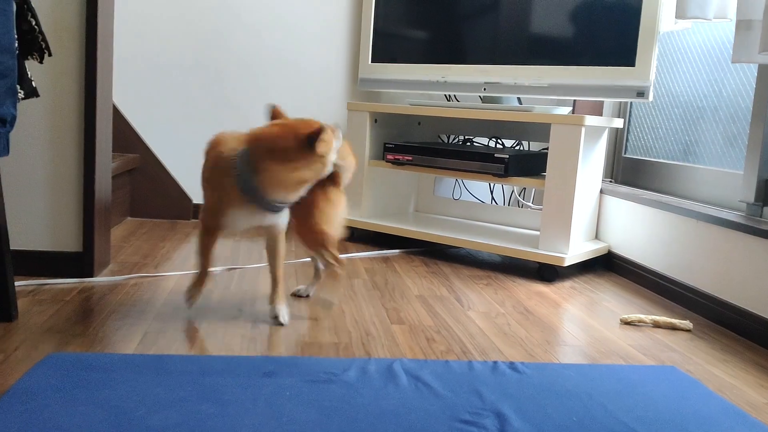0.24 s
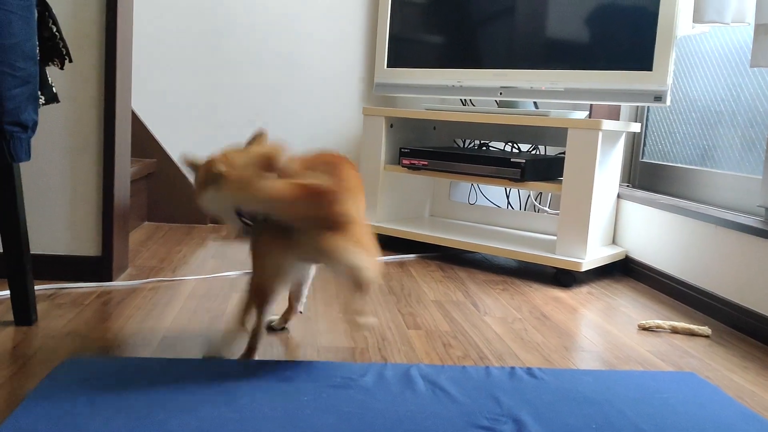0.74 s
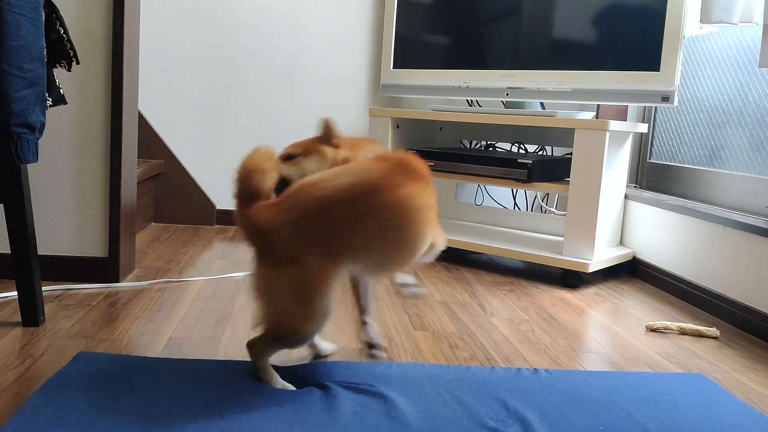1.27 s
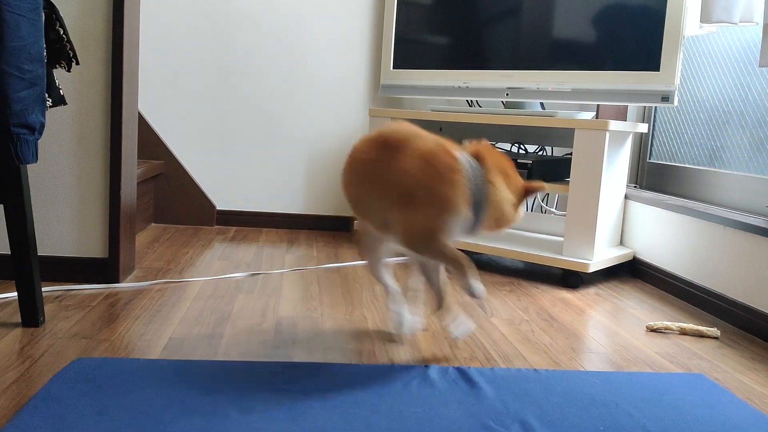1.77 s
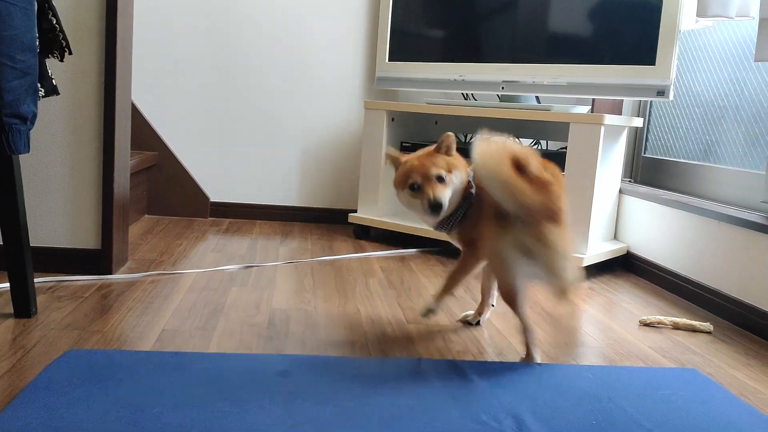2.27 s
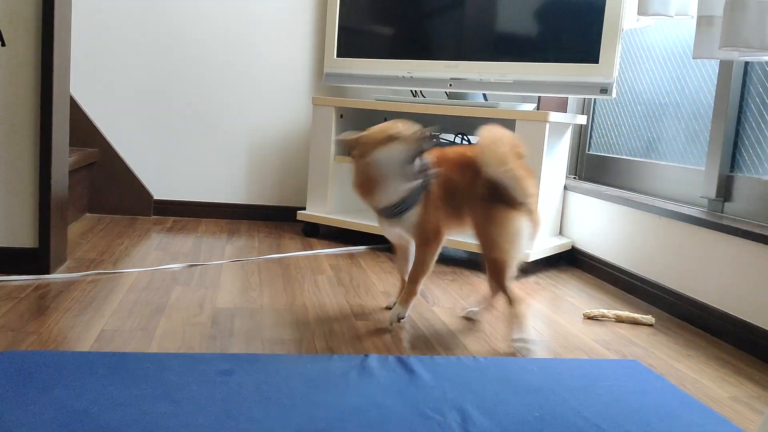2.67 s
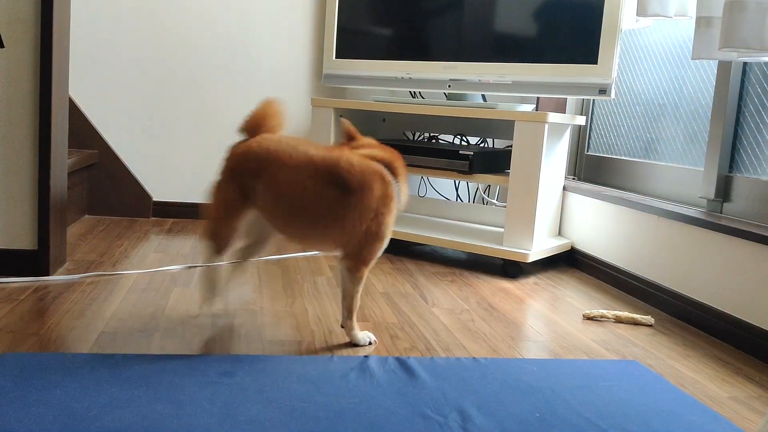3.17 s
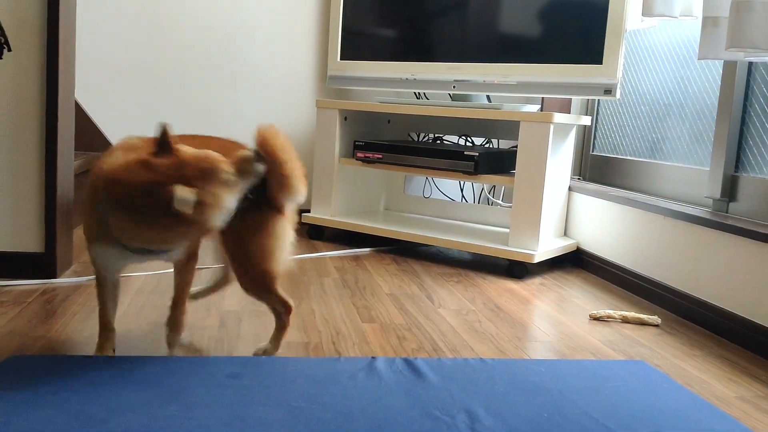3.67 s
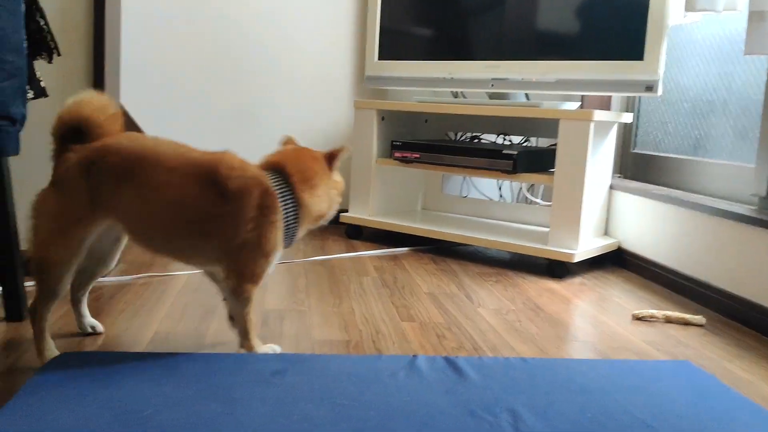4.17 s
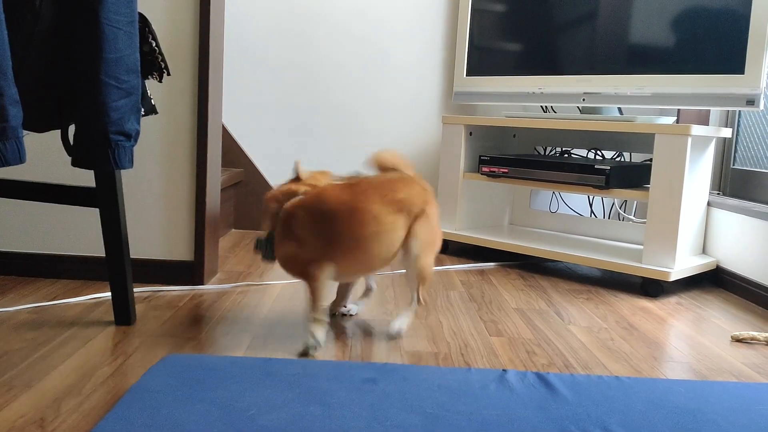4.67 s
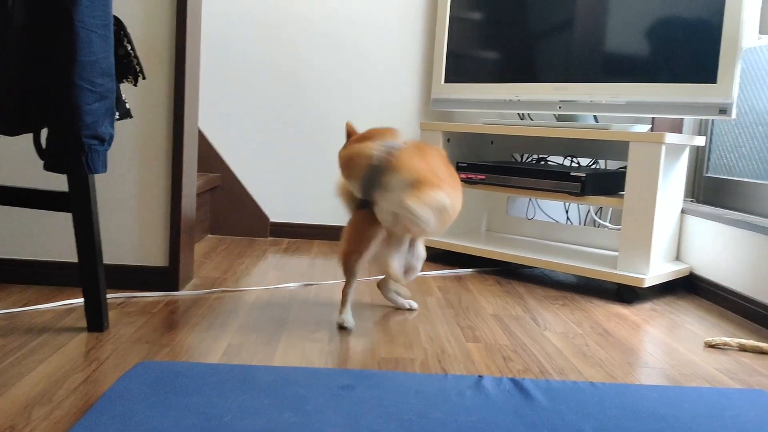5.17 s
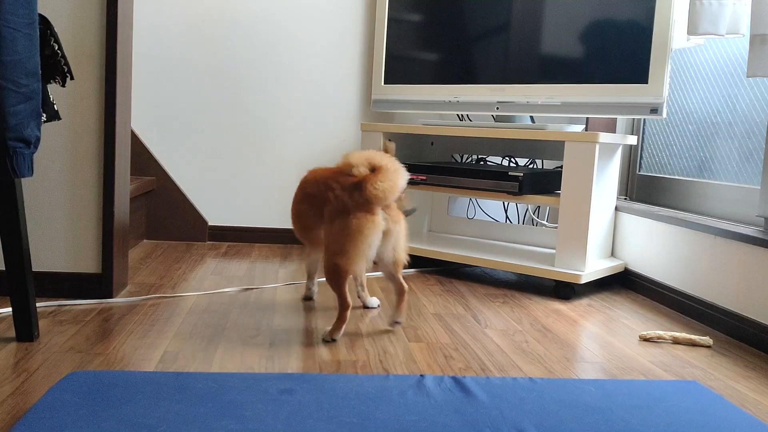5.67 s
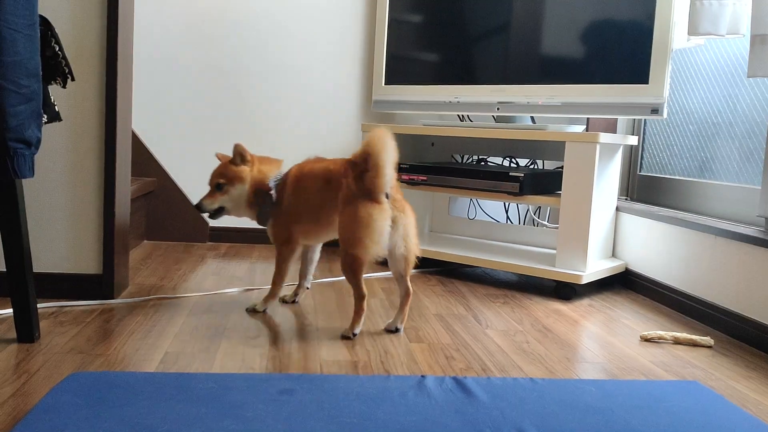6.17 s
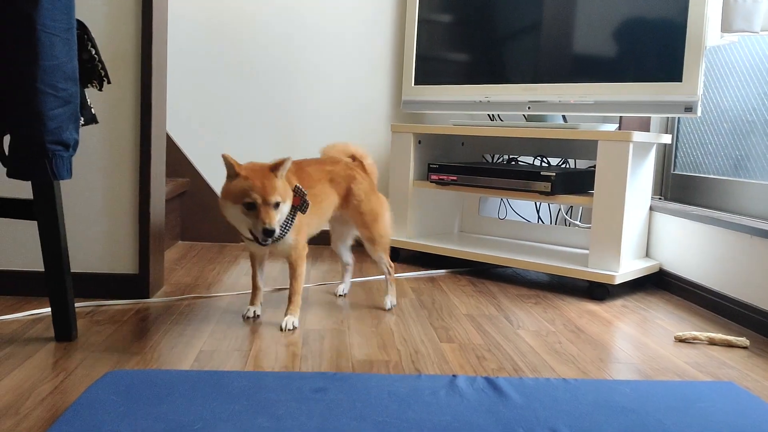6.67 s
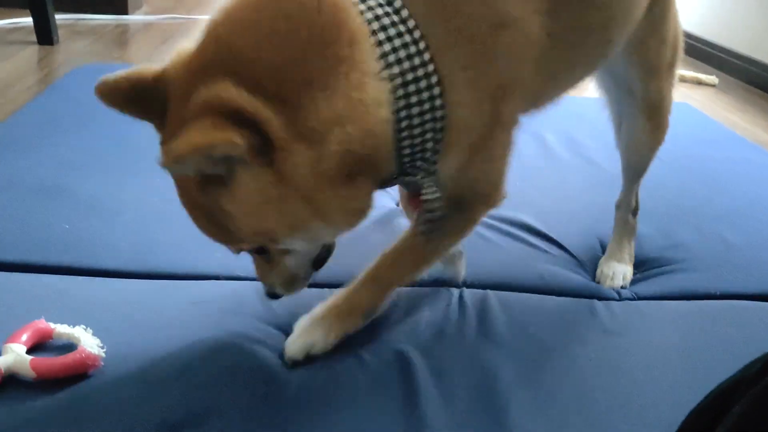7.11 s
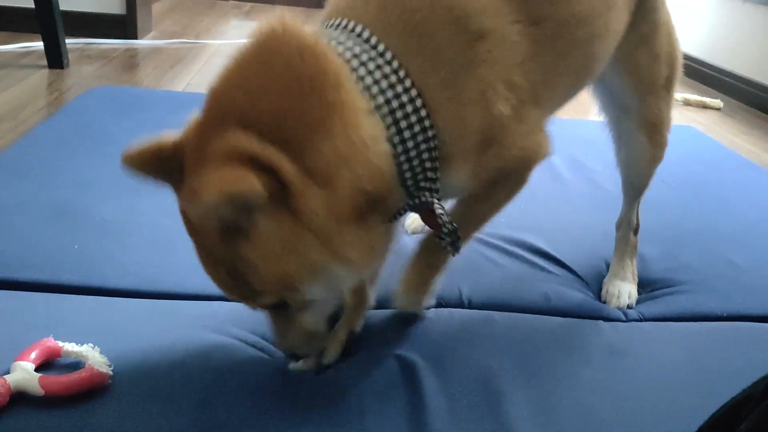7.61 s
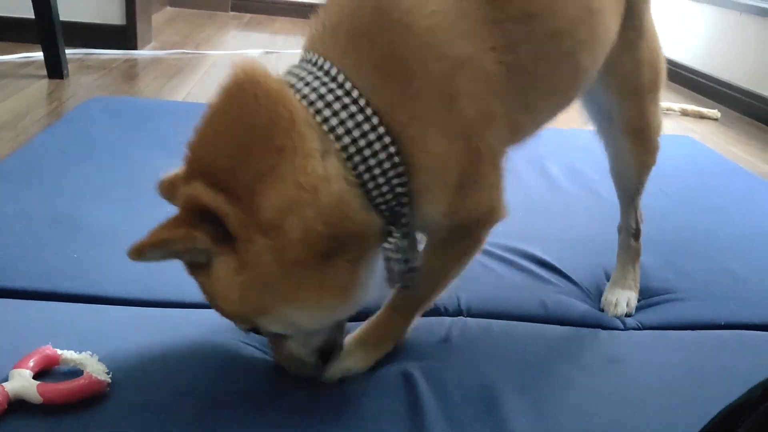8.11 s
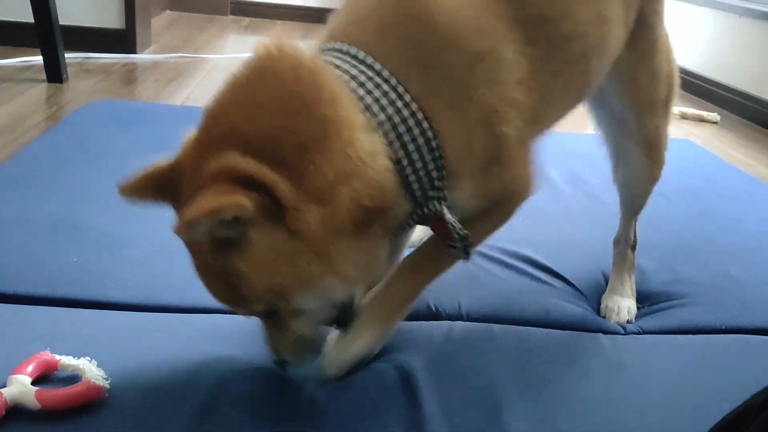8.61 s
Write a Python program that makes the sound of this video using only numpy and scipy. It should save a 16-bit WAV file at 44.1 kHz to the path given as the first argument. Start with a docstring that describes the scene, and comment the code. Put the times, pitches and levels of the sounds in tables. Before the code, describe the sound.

Light dog footfalls scatter across a wooden floor a few metres from a stereo microphone, clicking, scuffing and slipping in short bursts with short room ring and abrupt changes between bouts. One turn rustles and knocks on a soft mat. Then a brief gap, low pops, and about eleven nearby digging strokes scrape over cloth, roughly six per second, with soft thuds and snaps, over low floor rumble.

```python
"""Living room, wooden floor: a small dog spins and dashes in short bouts, the room ring cut between them.
Footfalls: claw ticks, pad scuffs, board thumps and short slips, from damped pulses, grains and modes.
Some paws scratch or squeak (stick-slip); in one turn they skid over a soft mat (rustling noise, knocks).
After a brief silence and low pops the dog digs close by at a fabric-covered mat: each stroke rasps,
zips across the weave and ends in a thud and a snap. Behind: room air and a low floor rumble."""
import sys
import numpy as np
from scipy import signal
from scipy.fft import rfft, irfft
from scipy.io import wavfile
from scipy.ndimage import uniform_filter1d

SR = 44100
rng = np.random.default_rng(int(sys.argv[2]) if len(sys.argv) > 2 else 0)


def generate_wav(sig):
    """Save sig (samples, or channels by samples) to the path in sys.argv[1] as 16-bit PCM at SR."""
    pcm = np.round(np.clip(np.atleast_2d(sig).T, -1, 1) * 32767).astype(np.int16)
    wavfile.write(sys.argv[1], SR, pcm)


N = 390285
TIME = np.arange(N) / SR

# Source levels in dB are taken before the direct and room gains given to place().
# footfalls: start_s, tick_db, tick_hz, weight_db, board_spot_hz
FOOTFALLS = [(0.236, -63, 5260, -75, 85), (0.248, -61, 5200, -85, 85), (0.2623, -47, 5750, -58, 85),
             (0.3428, -48, 5130, -65, 100), (0.4237, -51, 5000, -63, 185), (0.4264, -49, 5100, -74, 185),
             (0.4866, -51, 5250, -56, 214), (0.5892, -39, 5630, -48, 97), (0.727, -44.5, 5700, -61.5, 260),
             (0.789, -48, 5600, -70, 260), (0.824, -47, 5000, -49, 260), (0.8297, -42, 5060, -60, 260),
             (0.8502, -43, 5800, -52, 412), (0.901, -41, 6360, -62, 430), (0.909, -43.5, 5000, -45.5, 153),
             (1.1982, -42.5, 5400, -54, 430), (1.4915, -45, 5600, -46.5, 276),
             (1.6845, -45, 5570, -50, 151), (1.7179, -57, 5300, -70, 450), (1.89, -51, 5000, -90, 375),
             (1.907, -46, 5370, -49.5, 365), (2.1322, -45, 4840, -52.5, 90), (2.139, -55, 5200, -60, 284),
             (2.239, -51, 4740, -58.5, 162), (2.245, -57, 4970, -64, 155), (2.263, -60, 5460, -65, 155),
             (2.439, -51.5, 5130, -69, 110), (2.4915, -51.5, 5160, -66, 135),
             (2.7793, -41, 5700, -52.5, 318), (2.912, -54, 5130, -64, 126), (2.965, -53, 5470, -75, 430),
             (3.01, -56, 6620, -59.5, 413), (3.0926, -39.5, 5670, -48.5, 258), (3.1783, -47, 4900, -67, 85),
             (3.229, -55, 5140, -75, 90), (3.294, -52, 5360, -57.5, 97), (3.359, -46.5, 5270, -48, 154),
             (3.3685, -56, 5300, -57.5, 154), (3.53, -43.5, 6230, -51.5, 171),
             (3.6088, -55, 5000, -65, 150), (3.7395, -49.5, 5100, -61.5, 182),
             (3.747, -48.5, 5040, -93, 197), (3.8246, -47, 5860, -50.5, 99), (3.8327, -52, 5450, -65, 200),
             (3.858, -46, 5700, -87, 90), (4.039, -51, 5800, -59, 205), (4.1114, -36.5, 6200, -53, 98),
             (4.178, -59, 5900, -52, 260), (4.344, -52.5, 5050, -66, 338), (4.383, -46.5, 5900, -57, 185),
             (4.4545, -42, 5140, -45.5, 184), (4.4622, -52, 4900, -51, 850), (4.582, -53, 4900, -85, 85),
             (4.669, -43.5, 5800, -49, 269), (4.684, -47, 5200, -45, 280), (4.7288, -41, 4300, -47.5, 383),
             (4.782, -51, 6000, -61, 250), (5.02, -44.5, 5150, -60, 306), (5.0634, -46, 5030, -59, 135),
             (5.1972, -41, 4400, -42.5, 183), (5.358, -53, 4300, -66, 430), (5.407, -44, 4730, -89, 430),
             (5.481, -49.5, 4670, -58.5, 300), (5.491, -49, 4760, -84, 270),
             (5.543, -39.5, 4630, -46.5, 257), (5.763, -68, 5000, -94, 195), (5.9072, -56, 4270, -63, 175),
             (5.926, -46.5, 5100, -59, 178), (6.0534, -51, 4560, -70, 100), (6.2183, -68, 4700, -73.5, 430),
             (6.345, -62, 4700, -91, 215), (6.3749, -50.5, 4900, -87, 325),
             (6.434, -43.5, 4700, -51.5, 305), (6.593, -43.5, 4920, -51, 213),
             (6.7214, -54, 4230, -68, 270), (6.7666, -48, 4540, -66.5, 227)]
# short scratchy slides and faint rustles, and at the very start a brief scratchy burst: start_s, length_s,
# level_db
SCRATCHES = [(.002, 0.0058, -56), (0.274, 0.11, -61.5), (0.724, 0.073, -55.5), (.962, 0.13, -53),
             (1.333, 0.15, -62), (1.85, 0.15, -57), (2.259, 0.13, -61.5), (2.333, 0.047, -54),
             (2.501, 0.094, -56.5), (2.66, 0.39, -65.5), (3.007, 0.19, -64.5), (3.147, 0.048, -54),
             (3.448, 0.047, -60), (3.556, 0.032, -56.5), (3.849, 0.059, -57.5), (4.206, 0.052, -57),
             (4.517, 0.044, -57), (4.863, 0.16, -65), (5.007, 0.024, -51.5), (5.377, 0.031, -49),
             (5.762, 0.13, -73.5), (6.98, 0.13, -64.5)]
# skids over the mat: start_s, length_s, initial_rustle_db, initial_upper_edge_hz
MAT_SKIDS = [(0.791, 0.36, -44, 1950), (1.129, 0.19, -50.5, 1020), (1.271, 0.21, -53, 700),
             (1.41, 0.11, -51.5, 700)]
# paw knocks on the mat: start_s, level_db, spot_hz
MAT_KNOCKS = [(0.888, -50, 380), (.94, -47, 260), (1.003, -45.5, 304), (1.095, -40.5, 188),
              (1.145, -42, 460), (1.175, -48, 404), (1.253, -63, 280)]
# pad squeaks: start_s, length_s, level_db, from_hz, to_hz
PAD_SQUEAKS = [(0.786, 0.062, -50.5, 1186, 1533), (0.803, 0.058, -51.5, 1055, 895),
               (0.878, 0.13, -54, 1488, 1784), (2.275, 0.054, -57, 2094, 1676),
               (3.455, 0.029, -56.5, 1487, 1433), (4.465, 0.048, -56, 955, 820),
               (4.72, 0.021, -53, 1544, 1620), (5.874, 0.03, -60.5, 776, 1170)]
# digging strokes: start_s, length_s, rasp_db, drag_hz, drag_db, flick_hz, flick_db,
# drag_jitter (rms share of pitch), thud_db
DIG_STROKES = [(7.127, 0.065, -49, 2367, -50, 6840, -51, 0.15, -57),
               (7.249, 0.083, -50, 2207, -43.5, 3815, -54, 0.05, -49.5),
               (7.414, 0.072, -49, 2640, -50.5, 6600, -53.5, 0.14, -57),
               (7.588, 0.055, -48.5, 2866, -47, 5960, -52.5, 0.12, -48.5),
               (7.74, 0.075, -49, 2345, -50, 6500, -59.5, 0.26, -62.5),
               (7.903, 0.067, -53, 2560, -47, 6100, -60.5, 0.02, -50.5),
               (8.081, 0.062, -54, 2480, -55, 5920, -65, 0.26, -63),
               (8.221, .046, -49, 2885, -50, 6800, -51, 0.09, -47),
               (8.4, 0.069, -54, 2566, -55, 5300, -63, 0.02, -68),
               (8.527, 0.071, -53, 2566, -51.5, 4240, -62, 0.08, -54.5),
               (8.696, 0.079, -52.5, 2495, -55, 6240, -63, 0.19, -63.5)]
# claws of one paw sliding at unlike speeds: rate (ratio to leading claw), level_db
CLAW_RATES = [(1, 0.5), (.86, -10.5), (1.12, -11)]
# padding rumble under the digging: time_s, level_db
KNEAD_LEVELS = [(7.12, -75), (7.25, -53), (7.37, -50), (7.55, -55.5), (7.75, -55.5), (7.9, -60), (8.2, -59),
                (8.35, -57), (8.4, -48.5), (8.45, -57.5), (8.85, -56.5)]
# soft low pops: start_s, level_db
LOW_POPS = [(6.988, -42.5), (7.048, -38), (7.062, -40.5), (7.107, -44.5)]
# floorboard modes: lowest_hz (each blow up to 4 % higher), relative_db, t60_s
BOARD_MODES = [(58, -9.5, 0.36), (87, 1.5, 0.2), (130.2, -14, 0.49), (156.7, 0, 0.14), (199.4, -1.5, 0.12),
               (228, -1, 0.13), (258, 5.5, 0.066), (296, 0, 0.089), (321.3, -2, 0.1), (373.5, 3.5, 0.072),
               (445.5, 3, 0.045), (536, -1.5, 0.063), (679, -7.5, 0.08), (806, -13.5, 0.17),
               (946, 2.5, 0.037), (1167, -15, 0.039), (1320, -45, 0.054)]
# spectra of pad scuff, scratchy slide, claw tick: hz, density_db
SCUFF_SPECTRUM = [(200, -5.5), (500, 1.5), (1000, -4), (1600, 2.5), (2300, 1.5), (3100, 1.5), (3900, -4),
                  (4700, 5.5), (5500, -1.5), (6600, -1), (8000, -9.5), (10000, -17), (15500, -20.5)]
SLIDE_SPECTRUM = [(200, -14), (600, -10), (1300, -10.5), (2300, 1), (3100, -3), (3900, -7.5), (4750, 8),
                  (5500, -4), (6600, -0.5), (8000, -11), (10000, -21.5), (15500, -23)]
CLAW_SPECTRUM = [(500, -25), (2500, 0), (3800, -4), (4700, 4.5), (5500, 0), (7000, 7.5), (8300, 4.5),
                 (10000, -11), (15500, -47)]
# spectra of mat rustle and one skid jolt: hz, density_db
RUSTLE_SPECTRUM = [(40, -15), (110, 0), (250, 3), (470, -3), (620, -9), (820, 1.5), (1000, -1),
                   (1300, -0.5), (1600, 2), (4000, 3)]
JUDDER_SPECTRUM = [(40, -21), (120, -2), (200, 2), (290, 4), (380, -4), (470, 5), (600, -15), (850, -16),
                   (1300, -24), (4000, -29.5)]
# spectra of cloth rasp, cloth snap, paw thud, padding: hz, density_db
FABRIC_SPECTRUM = [(80, -8.5), (300, -4.5), (700, -2.5), (1300, 1.5), (1800, -1), (2350, 4), (3200, -2.5),
                   (4000, -4.5), (4900, 2), (6300, -1), (7500, -16.5), (9500, -23), (15500, -11)]
SNAP_SPECTRUM = [(100, -47), (500, 5), (1000, -0.5), (1700, 6.5), (2500, 3.5), (4000, 1), (6300, -3),
                 (9000, -47), (15500, -66)]
THUD_SPECTRUM = [(40, -5), (100, 6.5), (200, -1.5), (330, 1.5), (560, -0.5), (900, -2), (2000, -22),
                 (6000, -30)]
PADDING_SPECTRUM = [(30, -9), (70, -3), (140, -2.5), (280, -2.5), (450, -5), (900, -18), (3000, -48)]
# spectra of floor rumble and room air: hz, density_db
RUMBLE_SPECTRUM = [(5, 0), (15, 4), (28, 15), (45, 4.5), (90, -17.5), (150, -40), (600, -81)]
AIR_SPECTRUM = [(20, 8), (65, -1.5), (160, -8), (300, -6.5), (600, -15), (1100, -16), (2200, -24.5),
                (3800, -28), (4800, -24), (7000, -30.5), (11000, -35), (16000, -53)]
# room ring: hz, t60_s
RING_T60 = [(100, 0.53), (400, 0.44), (1200, 0.49), (2500, 0.48), (5000, 0.44), (8000, 0.45), (15000, 0.34)]
# likeness of the two channels: hz, likeness (0-1)
CHANNEL_LIKENESS = [(100, 0.98), (300, 0.87), (600, 0.51), (1200, 0.054), (16000, 0)]
# bout boundaries: time_s
BOUT_EDGES_S = [0, 0.109, 2.611, 4.277, 5.679, 6.245, 6.944, 8.85]
# silence before the last bout: from_s, to_s
SILENCE_S = (6.944, 6.987)
# drag and flick level curves: centre, width (shares of the stroke)
DRAG_CURVE = (0.39, 0.46)
FLICK_CURVE = (0.91, 0.13)

# footfalls: reference weight and tick, then scuff and knock levels there and growth in dB per dB
FIRM_DB, SHARP_DB = -50, -44
SCUFF_DB, SCUFF_GROWTH, SCUFF_WITH_TICK = -54, 0.48, 0.17
KNOCK_DB, KNOCK_GROWTH = -59.5, 1
SPOT_DB, SPOT_OCTAVES = 8, 0.3  # boost of modes near a spot's pitch
SKIP_DB_PER_S = -2200
SLIP_AFTER_S, SLIP_S, SLIP_DB = .025, 0.082, -21.5  # level against the claw tick
# left lean of ticks up to LEAN_HZ; higher ones sit nearer the middle
LEAN_HZ, LEAN_DB, LEAN_DB_PER_OCTAVE = 5070, 14, -58
# skids fade and darken as the paw slows
SKID_RAMP_S, SKID_DB_PER_S, SKID_OCTAVES_PER_S = 0.02, -19, -5.5
MAT_DAMP_S = 0.033
# zip pitch: catch, settle into the drag, flick free (shares of the stroke)
CATCH_HZ, CATCH_S = 400, .016
FLICK_FROM, FLICK_SPREAD = .77, .075
RASP_OVERRUN_S = 0.013
# cloth snap and paw rebound; levels against the first thud
SNAP_AFTER_S, SNAP_DB, REBOUND_DB, REBOUND_JITTER_S = .0068, 7.5, -2.5, 0.00199
SWING_SCALE_DB, SWING_S, SWING_FADE_S = -15, 0.21, 0.12
# rumble at rest, and its swell against a landing's weight before the envelope
REST_DB, SWAY_DB, SWAY_RISE_S, SWAY_FADE_S = -63.5, -3, 0.016, 0.098
DIG_SWAY_DB = 2  # added to the thud level for the swell under the digging
AIR_DB, EDGE_HZ = -62, 15900


def amp(db):
    """Decibels to gain."""
    return 10 ** (np.asarray(db) / 20)


def read(points, hz):
    """A table's value at hz, on a log axis."""
    f, value = np.transpose(points)
    return np.interp(np.log(hz + 1), np.log(f + 1), value)


def evened(x):
    """Scales to rms 1."""
    return x / np.sqrt(np.mean(x ** 2) + 1e-20)


def sized(x, db, seconds):
    """Gives a short sound the energy of level db held for so many seconds."""
    return x * amp(db) * np.sqrt(seconds * SR / (np.sum(x ** 2) + 1e-20))


def bump(x, centre, width):
    """A bell curve of height 1."""
    return np.exp(-((x - centre) / width) ** 2)


def add(mix, s, sound):
    """Mixes a sound in at time s."""
    part = mix[..., max(round(s * SR), 0):][..., :sound.shape[-1]]
    part += sound[..., :part.shape[-1]]


def colour(x, spectrum, size=2048):
    """Causal minimum-phase filter with the given spectrum."""
    log_gain = np.log(amp(read(spectrum, abs(np.fft.fftfreq(size, 1 / SR)))))
    taps = np.fft.ifft(np.exp(np.conj(signal.hilbert(log_gain)))).real
    return signal.fftconvolve(x, taps[:size // 2])


def muffled(x, times_s, edge_hz):
    """Low-pass whose edge moves over time; result at rms 1."""
    hz, frames_s, z = signal.stft(x, SR, nperseg=256)
    edge = np.interp(frames_s, times_s, edge_hz)
    z = z / np.sqrt(1 + (hz[:, None] / edge) ** 5)
    return evened(signal.istft(z, SR, nperseg=256)[1][:len(x)])


def grains(n, per_s, spread_db, smooth):
    """Stick-slip: sparse catches of uneven size over a smooth hiss."""
    sizes = amp(spread_db * np.minimum(rng.exponential(1, n), 3.5))
    catches = (rng.random(n) < per_s / SR) * sizes
    return evened(catches * rng.choice([-1, 1], n)) + smooth * rng.standard_normal(n)


def jolts(n, median_per_s, uneven, spread_db):
    """A run of stick-slip jolts, unevenly spaced and of unequal size."""
    at = np.cumsum(np.exp(uneven * rng.standard_normal(size=200))) * SR / median_per_s
    at, out = at[at < n].astype(int), np.zeros(n)
    out[at] = amp(spread_db * rng.standard_normal(size=200))[:len(at)]
    return out


def spot(spectrum):
    """Each spot of the floor has its own peaks and dips, weaker in the treble."""
    hz = np.geomspace(150, 16000, 44)
    ripple_db = read([(2500, 2.905), (4500, 0.7)], hz)
    return np.column_stack([hz, read(spectrum, hz) + ripple_db * rng.standard_normal(len(hz))])


def paired(z, hz):
    """Makes two unrelated spectra alike in the bass."""
    alike = np.clip(read(CHANNEL_LIKENESS, hz), 0, 1)
    return np.array([z[0], alike * z[0] + np.sqrt(1 - alike ** 2) * z[1]])


def sides(left_db):
    """Gains of two channels that differ by left_db."""
    return amp(np.array([[left_db / 2], [-left_db / 2]]))


def room(x, early_db, early_s):
    """Dense reflections, strongest at first, each band dying at its own speed."""
    taps = rng.standard_normal((2, SR // 2)) * (rng.random((2, SR // 2)) < .15)
    hz, t, z = signal.stft(taps, SR, nperseg=256)
    z = paired(z, hz[:, None]) * amp(-60 * t / read(RING_T60, hz)[:, None])
    tail = signal.istft(z, SR, nperseg=256)[1]
    t = TIME[:tail.shape[1]]
    onset = np.clip((t - .002) / 0.00045, 0, 1)
    tail = tail * onset * (1 + amp(early_db) * np.exp(-t / early_s))
    return signal.fftconvolve(x[None], tail / np.linalg.norm(tail[0]), axes=1)


def place(mix, s, x, direct_db, wet_db, left_db=0, early_db=-4, lag_s=.00005):
    """Adds a sound, its left channel slightly late, and its room ring; all stops at the next bout edge."""
    sound = amp(wet_db) * room(x, early_db, early_s=0.0048) * sides(left_db / 2)
    left, right = amp(direct_db) * x * sides(left_db)
    add(sound[0], lag_s, left)
    add(sound[1], 0, right)
    end_s = BOUT_EDGES_S[np.searchsorted(BOUT_EDGES_S, s, "right")]
    add(mix, s, sound[:, :round((end_s - s) * SR)])


def steps(scuff_s=0.0082):
    """Claws tick and slip on; the heavier the landing, the more the pad scuffs and the boards thump."""
    out, t = np.zeros((2, N)), TIME[:SR // 10]
    for s, tick_db, hz, weight_db, spot_hz in FOOTFALLS:
        lean_db = np.clip(LEAN_DB + LEAN_DB_PER_OCTAVE * np.log2(hz / LEAN_HZ), 0, LEAN_DB)
        claw = sized(tick(hz), tick_db, 0.0045)
        place(out, s, claw, direct_db=0.0, wet_db=-1.0, left_db=lean_db)

        force_db = weight_db - FIRM_DB
        rub = grains(len(t), per_s=600, spread_db=5.0, smooth=0.61) * np.exp(-t / scuff_s)
        scuff_db = SCUFF_DB + SCUFF_GROWTH * force_db + SCUFF_WITH_TICK * (tick_db - SHARP_DB)
        scuff = sized(colour(rub, spot(SCUFF_SPECTRUM)), scuff_db, 0.037)
        place(out, s, scuff, direct_db=-6.0, wet_db=4.5, left_db=2.5, lag_s=.00012)

        knock = thump(spot_hz, push_s=0.00043, tilt_db=5.5)
        knock = sized(knock, KNOCK_DB + KNOCK_GROWTH * force_db, 0.043)
        boards = sized(thump(spot_hz), weight_db, 0.074) + knock
        place(out, s, boards, direct_db=-6.5, wet_db=-5.0, left_db=3.0)

        slip = chatter(SLIP_S, tick_db + SLIP_DB)
        place(out, s + SLIP_AFTER_S, slip, direct_db=-5.0, wet_db=-1.0, left_db=11.5)
    return out


def tick(hz, click_s=0.00024, ring_min_hz=4720, ring_s=0.0017, ring_db=-23.02, next_max_db=-9):
    """A claw strikes, skips and rings briefly; the paw's other claws follow within milliseconds."""
    t = TIME[:SR // 40]
    strike = (1 - np.exp(-t / 0.00007)) * np.exp(-t / click_s) * np.sin(2 * np.pi * hz * t)
    ring = np.sin(2 * np.pi * ring_min_hz * rng.uniform(1.0, 1.05) * t)
    strike += amp(ring_db) * np.exp(-t / ring_s) * ring
    paw = np.zeros(SR // 20)
    add(paw, 0, strike)
    for late_s in rng.uniform([.0003, .0008, .0014], [.0008, .0014, .003]):
        add(paw, late_s, amp(SKIP_DB_PER_S * late_s) * rng.uniform(0.53, 1.0) * strike)
    for late_s in rng.uniform([.003, .006, .007, .012], [.006, .008, .011, .025]):
        add(paw, late_s, amp(next_max_db) * rng.uniform(0.19, 1.0) * strike)
    return colour(paw, CLAW_SPECTRUM)


def thump(spot_hz, push_s=0.013, tilt_db=0):
    """A paw pushes the boards; modes near the spot's pitch gain, tilt_db per octave lifts the high ones."""
    t = TIME[:SR // 4]
    modes = np.zeros(len(t))
    for hz, db, t60_s in BOARD_MODES:
        near_db = SPOT_DB * bump(np.log2(hz / spot_hz), 0, SPOT_OCTAVES)
        level_db = db + near_db + tilt_db * np.log2(hz / 250)
        gain = amp(level_db - 60 * t / t60_s) * rng.uniform(0.67, 1.4)
        modes += gain * np.sin(2 * np.pi * (hz * rng.uniform(1.0, 1.04) * t + rng.random()))
    return modes * (1 - np.exp(-t / push_s))


def chatter(length_s, db):
    """Scratchy chatter: stick-slip grains through a spectrum that varies from spot to spot."""
    n = int(length_s * SR)
    catches = grains(n, per_s=330, spread_db=5.0, smooth=0.25) * signal.windows.tukey(n, .5)
    return sized(colour(catches, spot(SLIDE_SPECTRUM)), db, length_s)


def scratches():
    """Short scratchy slides and faint rustles of the paws, and a brief scratchy burst as the scene opens."""
    out = np.zeros((2, N))
    for s, length_s, db in SCRATCHES:
        place(out, s, chatter(length_s, db), direct_db=-3.5, wet_db=2.5, left_db=6.0)
    return out


def digging(snap_s=0.00022):
    """A stroke rasps the weave while claws pluck threads ever faster; the paw thuds, the cloth snaps back."""
    out = np.zeros((2, N))
    for s, length_s, rasp_db, drag_hz, drag_db, flick_hz, flick_db, jitter, thud_db in DIG_STROKES:
        rasp_s = length_s + RASP_OVERRUN_S
        t = TIME[:int(rasp_s * SR)]
        rasp = grains(len(t), per_s=1200, spread_db=2.5, smooth=0.7)
        rasp = colour(rasp, FABRIC_SPECTRUM)[:len(t)]
        rasp = muffled(rasp, [0, 0.16 * rasp_s, .5 * rasp_s], [1200, 4000, 18000])
        rasp = rasp * np.interp(t / rasp_s, [0, .3, .8, 1], [0.69, 0.4, 0.41, 0.28])
        rasp = sized(rasp, rasp_db, rasp_s)
        place(out, s, rasp, direct_db=-2.5, wet_db=-0.5, left_db=-1.5, lag_s=.00033)

        t = TIME[:int(length_s * SR)]
        share = t / length_s
        flick = 1 / (1 + np.exp((FLICK_FROM - share) / FLICK_SPREAD))
        hz = drag_hz + (CATCH_HZ - drag_hz) * np.exp(-t / CATCH_S) + (flick_hz - drag_hz) * flick
        claw = sized(zipping(hz, jitter) * bump(share, *DRAG_CURVE), drag_db, length_s)
        claw += sized(zipping(hz, jitter / 2) * bump(share, *FLICK_CURVE), flick_db, length_s)
        place(out, s, claw, direct_db=-0.5, wet_db=-2.5, lag_s=0.00039)

        landing = thud(thud_db)
        snap = colour(rng.standard_normal(len(t)) * np.exp(-t / snap_s), SNAP_SPECTRUM)
        add(landing, SNAP_AFTER_S, sized(snap, thud_db + SNAP_DB, 0.0046))
        place(out, s + length_s, landing, direct_db=2.5, wet_db=-4.5, left_db=2.5, lag_s=0.00013)
    return out


def zipping(hz, jitter, octave_db=-22, tug_s=0.0035, hold=0.64):
    """Claws catch and slip at rates tied to hz, their grip coming in uneven tugs."""
    n = len(hz)
    out = np.zeros(n)
    for rate, db in CLAW_RATES:
        wobble = evened(uniform_filter1d(rng.standard_normal(n), size=40))
        tugs = jolts(n, median_per_s=190, uneven=.5, spread_db=5.5)
        grip = hold + signal.lfilter([1], [1, -np.exp(-1 / (tug_s * SR))], tugs)
        turns = np.cumsum(rate * hz * (1 + jitter * wobble)) / SR
        tone = np.sin(2 * np.pi * turns) + amp(octave_db) * np.sin(4 * np.pi * turns)
        out += amp(db) * evened(grip) * tone
    return out * signal.windows.tukey(n, .12)


def thud(db, thud_s=0.0069, push_s=0.00046, crumple=0.64):
    """A paw hits the padding with a dead push and a short crumple, and settles with a second one."""
    t, out = TIME[:SR // 20], np.zeros(SR // 10)
    rebound_s = SNAP_AFTER_S + REBOUND_JITTER_S * rng.random()
    for s, level_db in (0, db), (rebound_s, db + REBOUND_DB):
        push = (1 - t / push_s) * np.exp(-t / push_s)
        blow = crumple * rng.standard_normal(len(t)) * np.exp(-t / thud_s) - push
        add(out, s, sized(colour(blow, THUD_SPECTRUM), level_db, 0.03))
    return out


def skid(judder_db=-4):
    """The mat rumples under a juddering paw, fading and darkening as it slows; damped boards knock."""
    out = np.zeros((2, N))
    for s, length_s, db, edge_hz in MAT_SKIDS:
        t = TIME[:int(length_s * SR)]
        rustle = grains(len(t), per_s=450, spread_db=2.5, smooth=0.7)
        rustle = colour(rustle, RUSTLE_SPECTRUM)[:len(t)]
        rustle = muffled(rustle, t, edge_hz * 2 ** (SKID_OCTAVES_PER_S * t))
        judder = jolts(len(t), median_per_s=110, uneven=0.49, spread_db=2)
        judder = colour(judder, JUDDER_SPECTRUM)[:len(t)]
        rustle = rustle + amp(judder_db) * evened(judder)
        ramps = np.minimum(np.minimum(t, length_s - t) / SKID_RAMP_S, 1)
        level = ramps * amp(db + SKID_DB_PER_S * t)
        place(out, s, rustle * level, direct_db=-6.5, wet_db=-4.0, left_db=2.0)
    for s, db, hz in MAT_KNOCKS:
        knock = thump(hz, push_s=0.0034) * np.exp(-TIME[:SR // 4] / MAT_DAMP_S)
        place(out, s, sized(knock, db, 0.025), direct_db=-5.0, wet_db=-3.5, left_db=2.5)
    return out


def squeaks():
    """A pad catches and slips, its pitch gliding with its speed."""
    out = np.zeros((2, N))
    for s, length_s, db, from_hz, to_hz in PAD_SQUEAKS:
        n = int(length_s * SR)
        squeak = zipping(np.linspace(from_hz, to_hz, n), jitter=0.08) * signal.windows.tukey(n, .6)
        place(out, s, sized(squeak, db, length_s), direct_db=1.5, wet_db=-1.5, lag_s=0.00033)
    return out


def kneading():
    """The mat's padding rumbles softly all through the digging."""
    out, start_s = np.zeros((2, N)), KNEAD_LEVELS[0][0]
    t = TIME[int(start_s * SR):]
    rumble = grains(len(t), per_s=150, spread_db=5.0, smooth=0.82)
    rumble = evened(colour(rumble, PADDING_SPECTRUM)[:len(t)])
    level = amp(np.interp(t, *np.transpose(KNEAD_LEVELS)))
    place(out, start_s, rumble * level, direct_db=-6.5, wet_db=-11, left_db=4.5)
    return out


def pops(fade_s=0.44, rise_s=0.000049):
    """Soft low pops: the level steps up and down by turns, ebbing over a slow swing."""
    out, t = np.zeros(N), TIME[:2 * SR]
    for k, (s, db) in enumerate(LOW_POPS):
        add(out, s, (-1) ** k * amp(db) * (np.exp(-t / fade_s) - np.exp(-t / rise_s)))
    swing = t / SWING_S * (1 - t / SWING_S) * np.exp(-t / SWING_FADE_S)
    add(out, LOW_POPS[0][0], amp(SWING_SCALE_DB) * swing)
    return out


def coloured_noise(spectrum):
    """Steady two-channel noise at rms 1, alike in the bass."""
    hz = np.fft.rfftfreq(N, 1 / SR)
    z = paired(rfft(rng.standard_normal((2, N))), hz)
    return evened(irfft(z * amp(read(spectrum, hz)), N))


def background():
    """Still room air, and a low floor rumble that swells after each footfall and digging thud."""
    air, low = coloured_noise(AIR_SPECTRUM), coloured_noise(RUMBLE_SPECTRUM)
    t, power = TIME[:SR], np.full(N, amp(REST_DB) ** 2)
    sway = (1 - np.exp(-t / SWAY_RISE_S)) * np.exp(-t / SWAY_FADE_S)
    landings = [(s, db) for s, _, _, db, _ in FOOTFALLS]
    landings += [(s + length_s, db + DIG_SWAY_DB) for s, length_s, *_, db in DIG_STROKES]
    for s, weight_db in landings:
        add(power, s, (amp(weight_db + SWAY_DB) * sway) ** 2)
    return (amp(AIR_DB) * air + np.sqrt(power) * low) * sides(2.6)


def scene():
    """The dog's sounds and the low pops over the room's background."""
    dog = steps() + scratches() + digging() + skid() + squeaks() + kneading()
    return dog + pops() + background()


def record(dry):
    """Silences the gap before the last bout, then limits the band."""
    running = uniform_filter1d(1. * ((TIME < SILENCE_S[0]) | (TIME > SILENCE_S[1])), size=100)
    low_pass = signal.firwin(511, EDGE_HZ, window=("kaiser", 9), fs=SR)
    return signal.oaconvolve(dry * running, low_pass[None], "same")


dry = scene()
out = record(dry)
generate_wav(out)
```